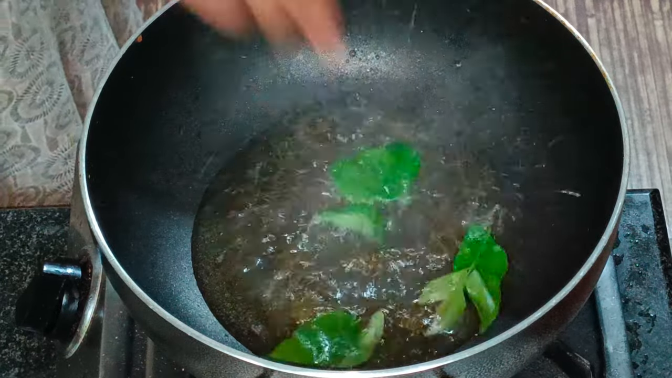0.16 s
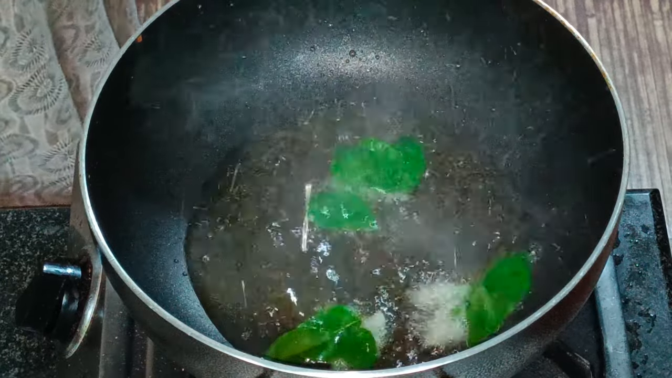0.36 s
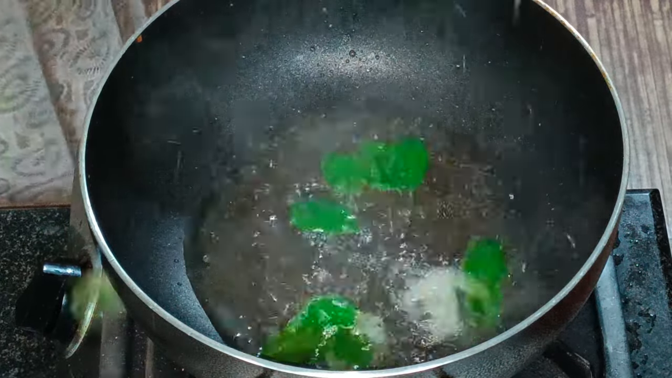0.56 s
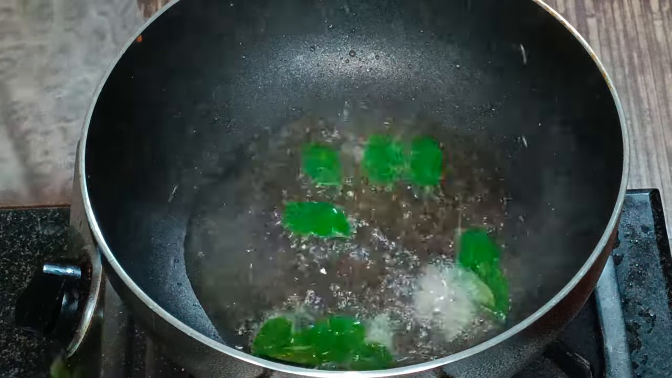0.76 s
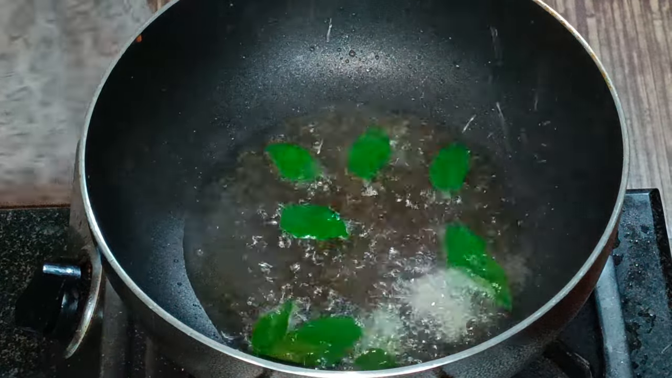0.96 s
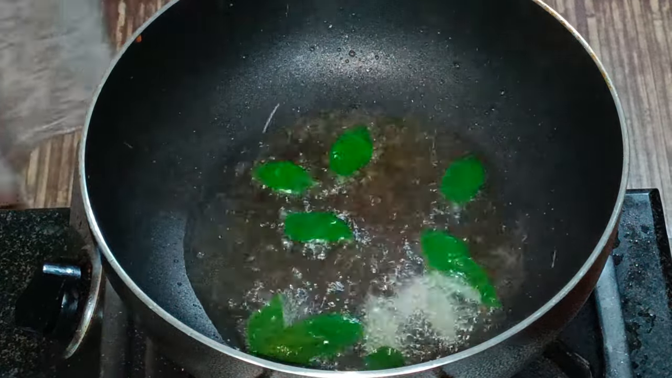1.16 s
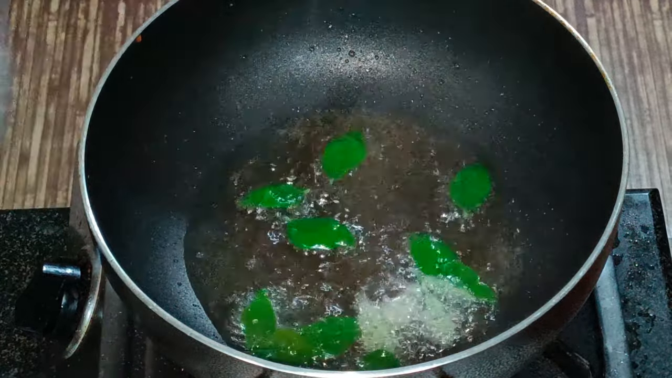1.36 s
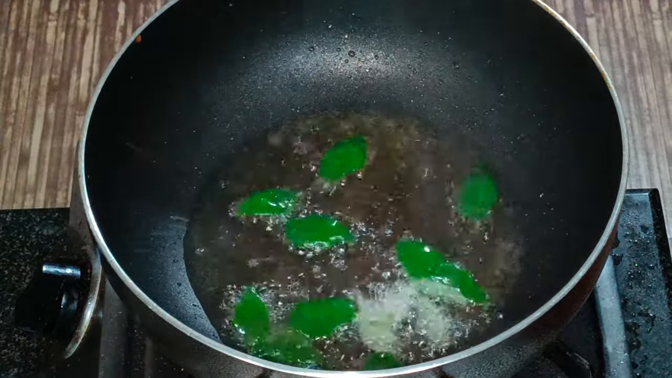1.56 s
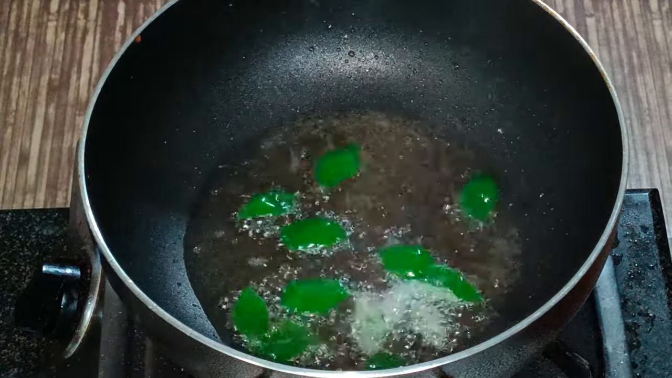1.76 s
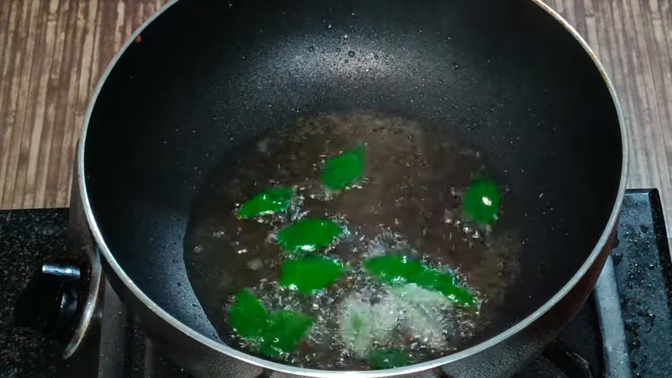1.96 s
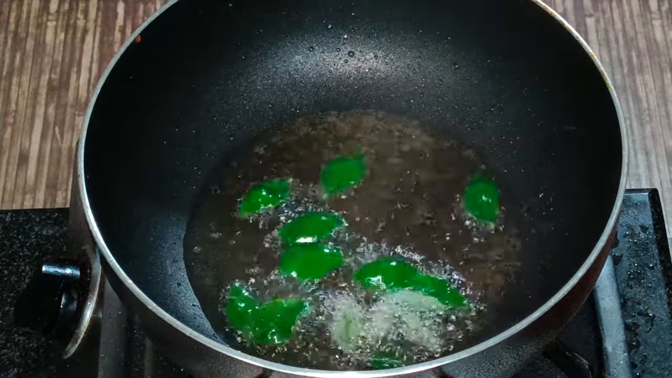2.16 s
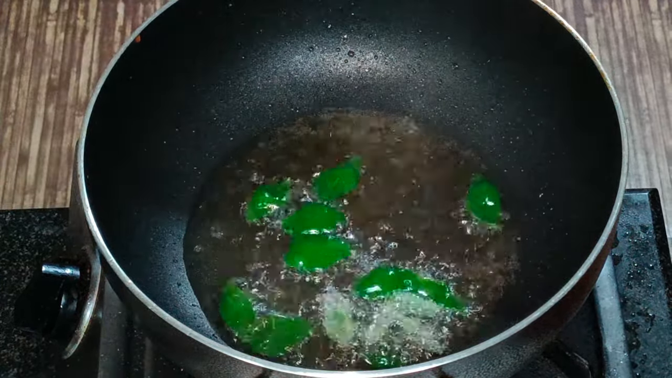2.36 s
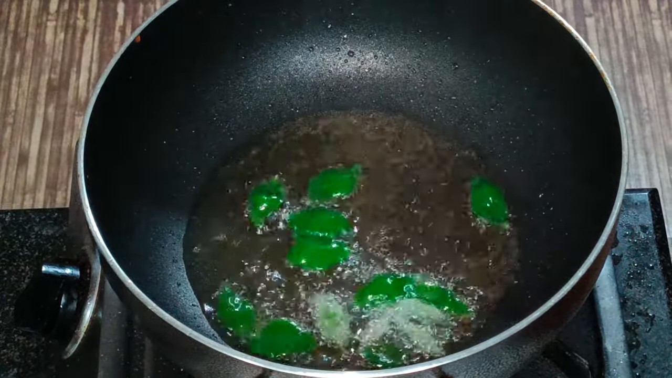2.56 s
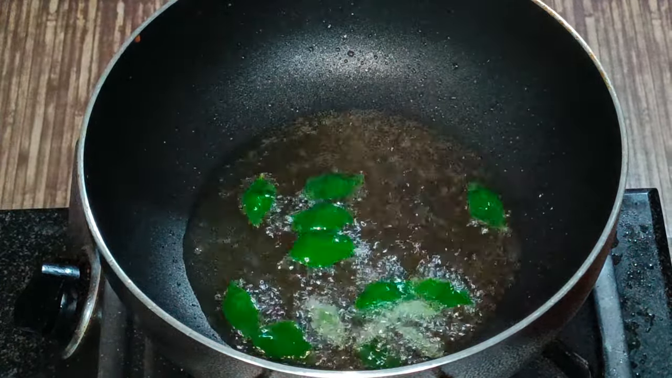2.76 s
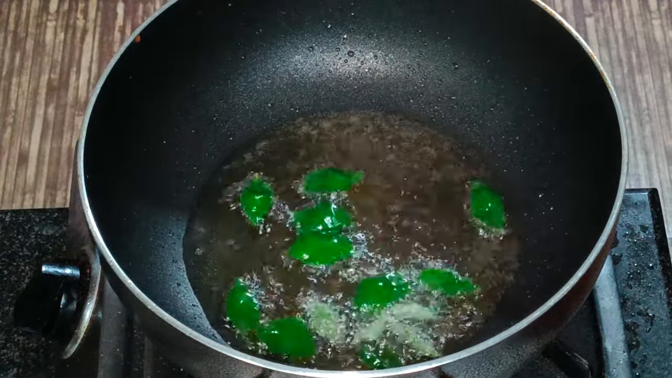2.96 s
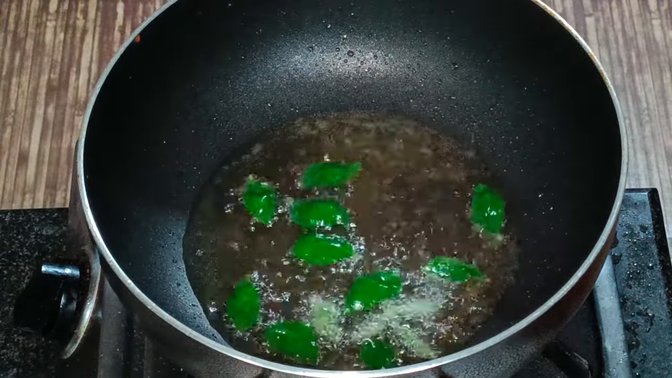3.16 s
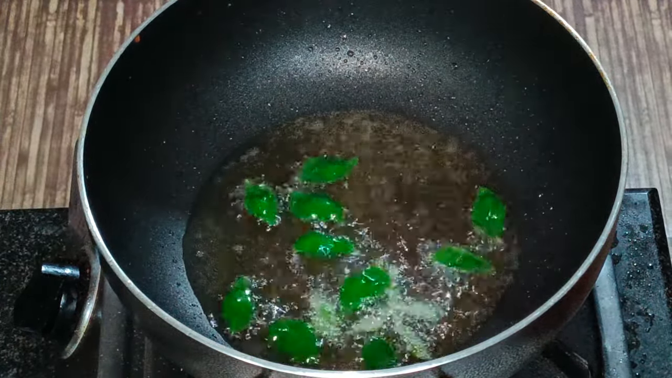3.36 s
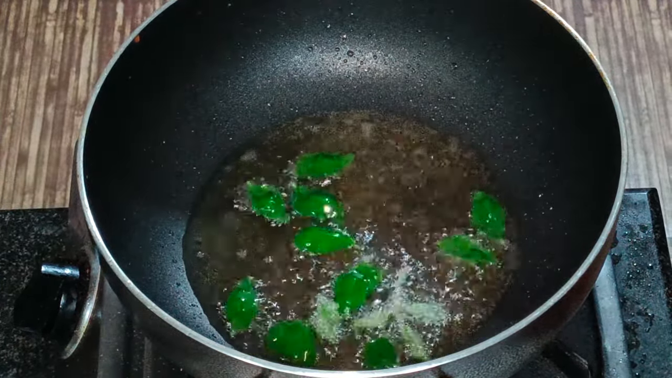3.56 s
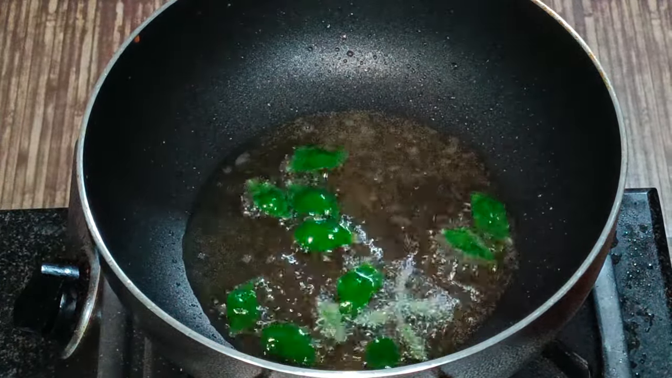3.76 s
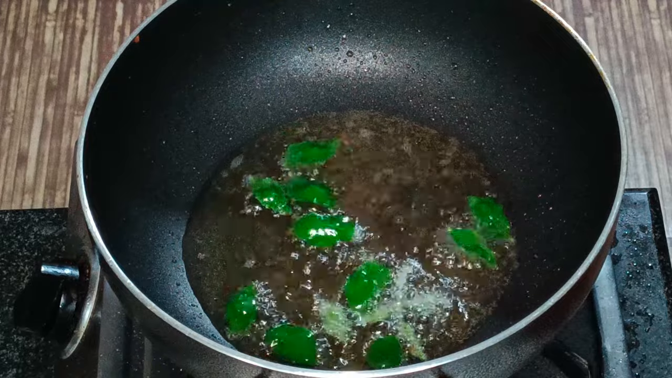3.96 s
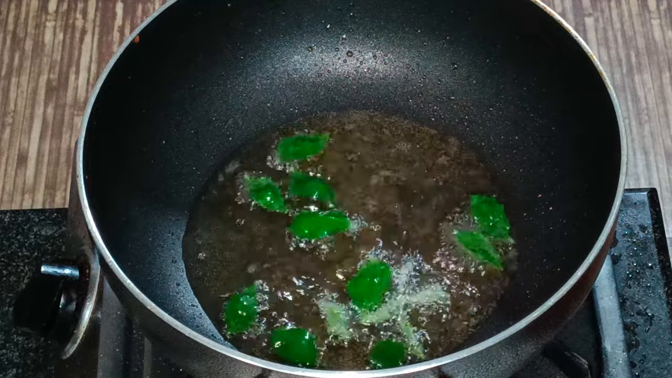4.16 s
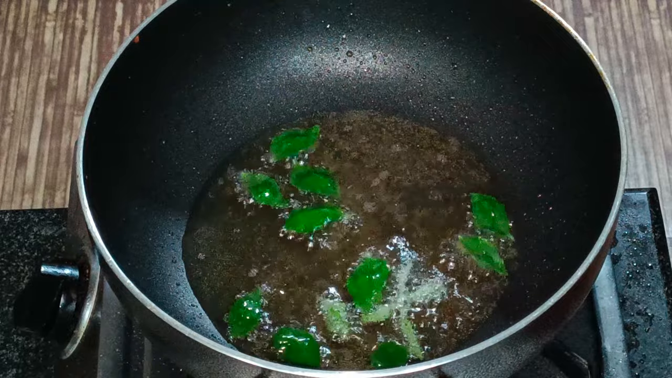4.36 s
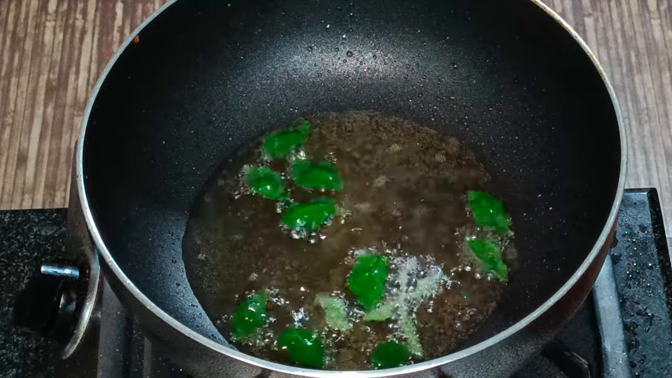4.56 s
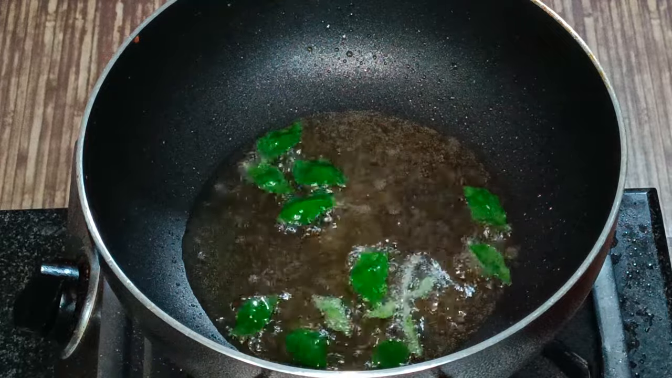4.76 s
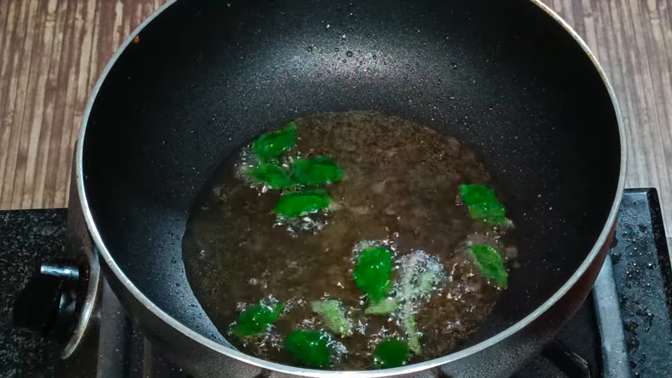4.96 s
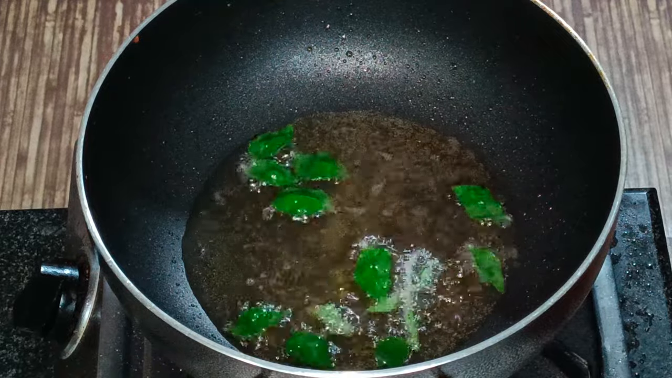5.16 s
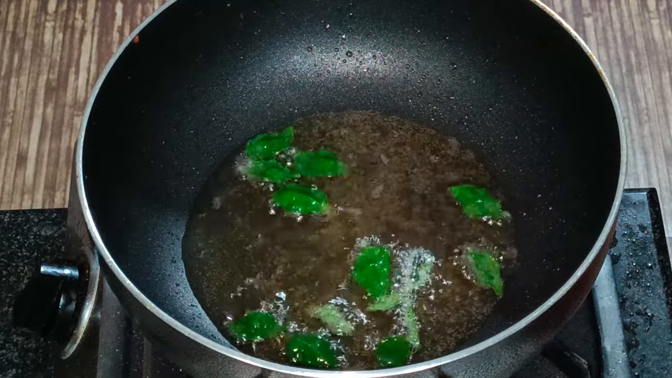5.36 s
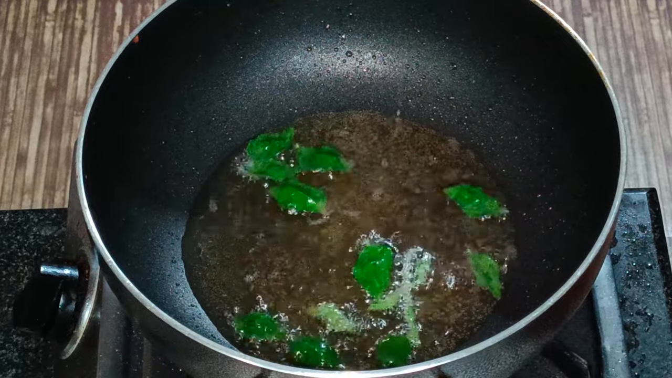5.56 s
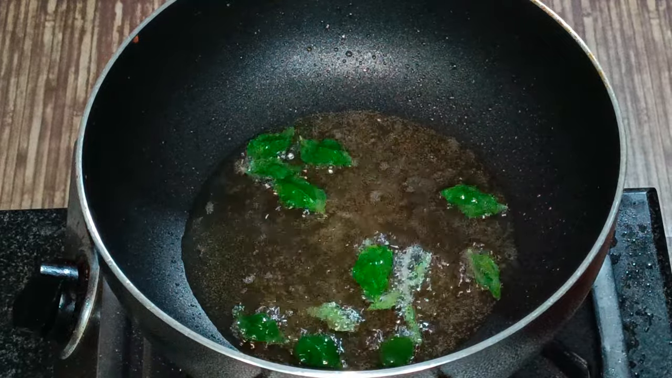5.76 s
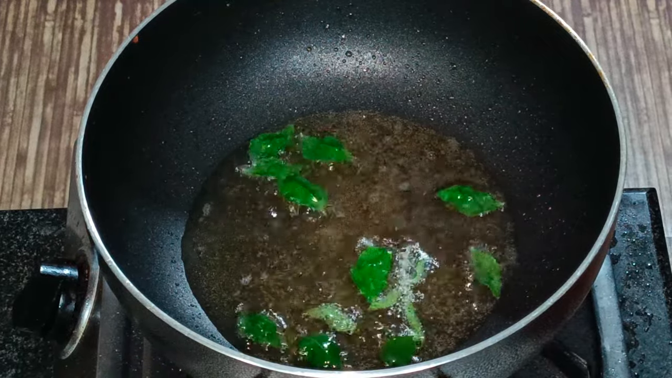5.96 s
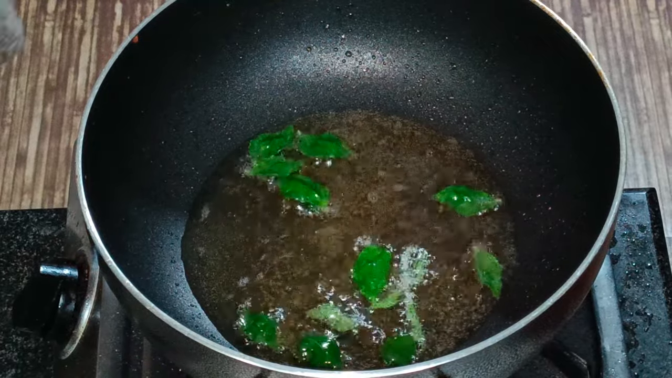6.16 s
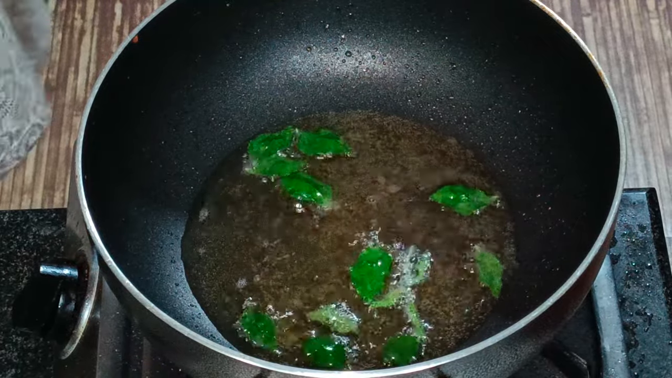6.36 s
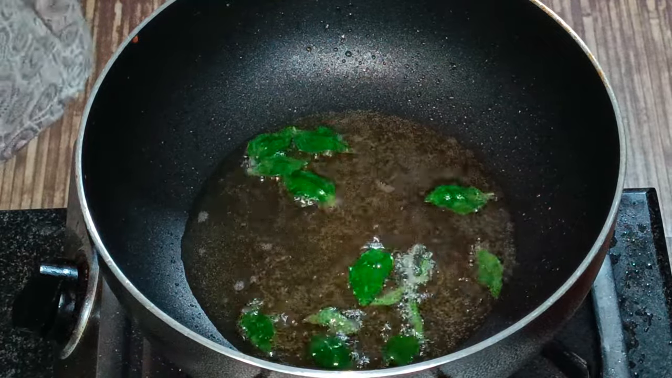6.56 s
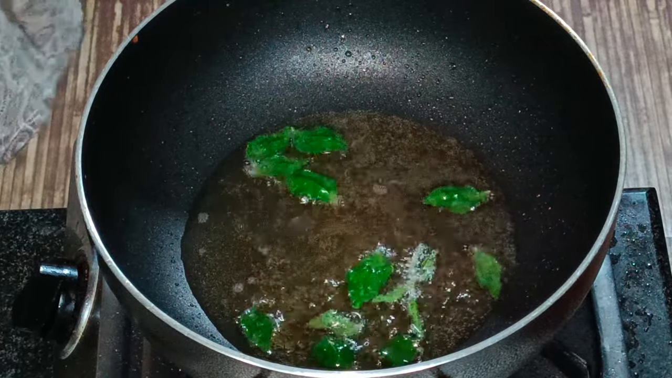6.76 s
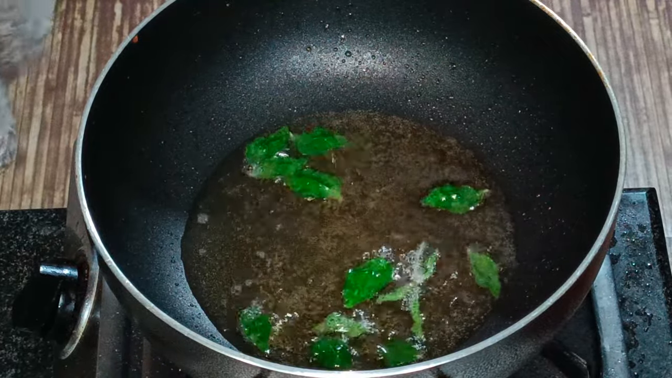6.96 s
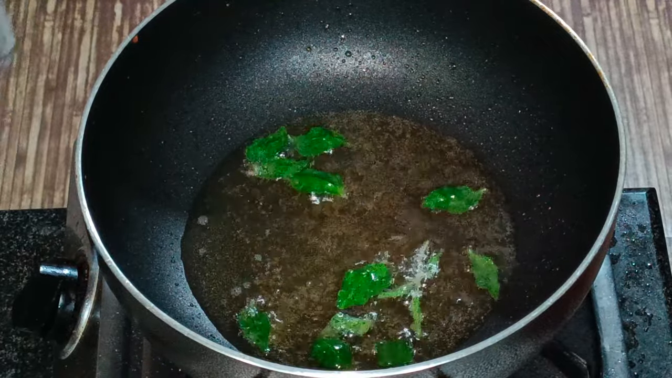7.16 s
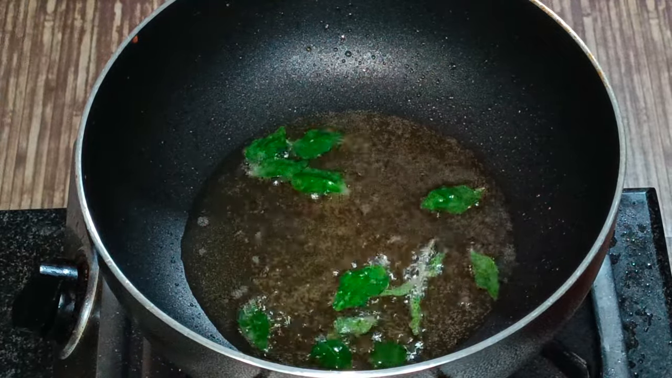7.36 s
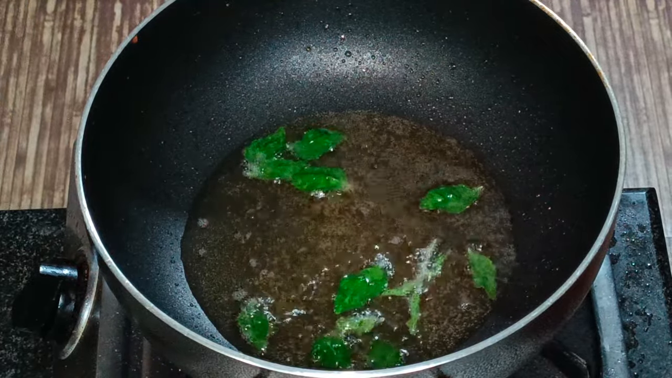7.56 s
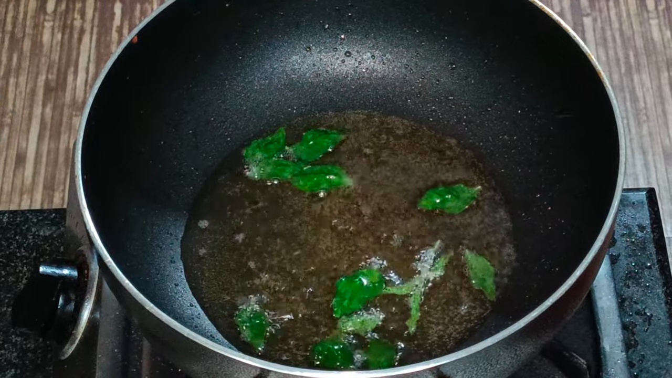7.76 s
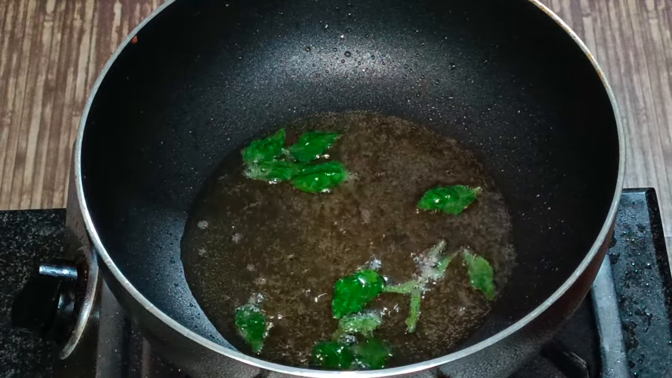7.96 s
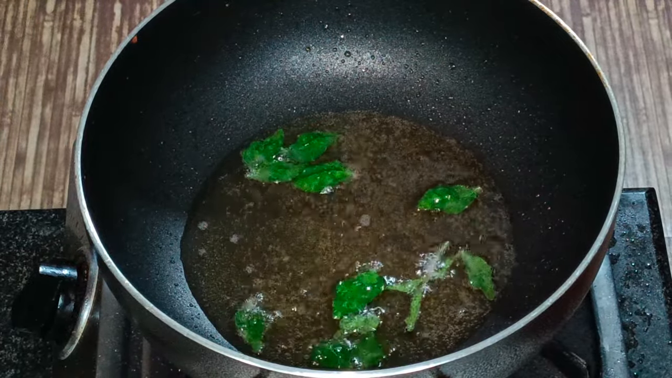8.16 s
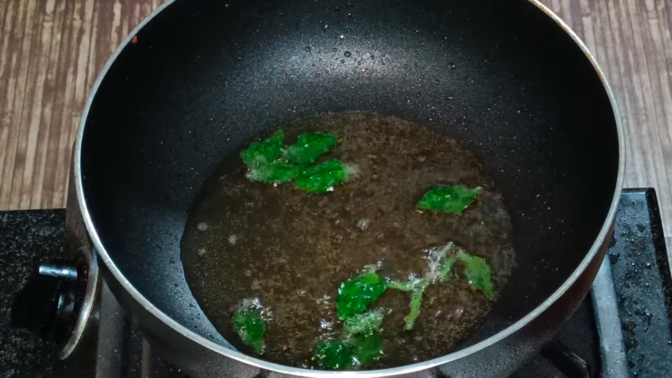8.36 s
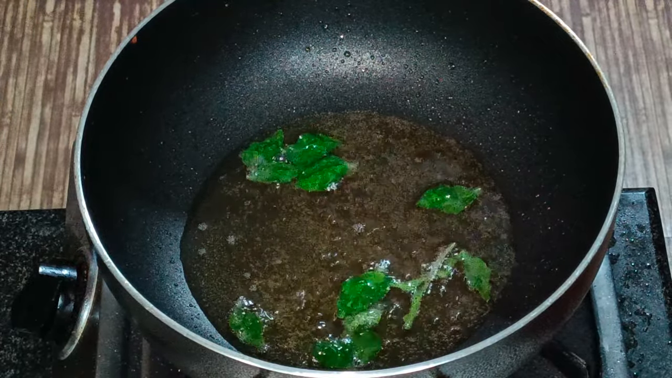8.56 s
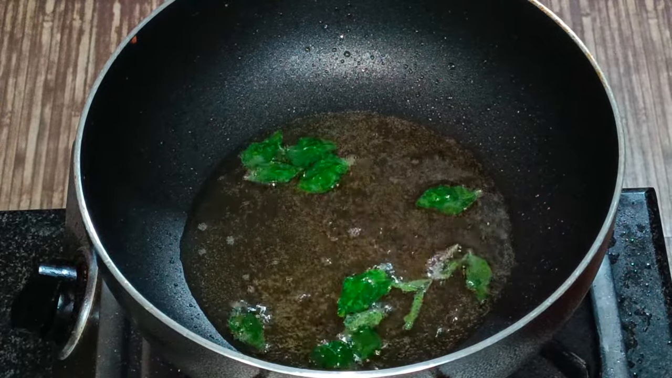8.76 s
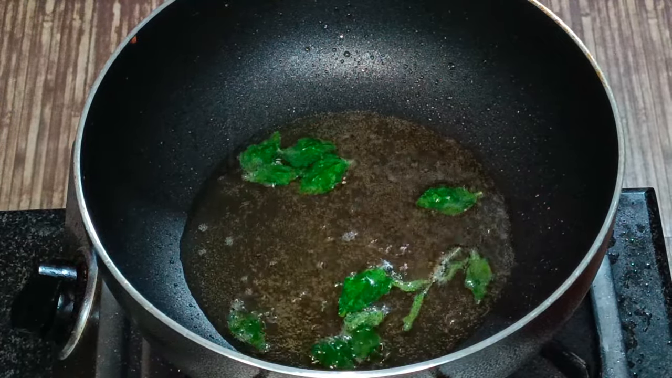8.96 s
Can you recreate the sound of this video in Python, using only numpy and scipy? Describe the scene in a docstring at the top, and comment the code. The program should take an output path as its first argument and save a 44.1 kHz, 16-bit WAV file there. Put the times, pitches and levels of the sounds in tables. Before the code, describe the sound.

Close up in stereo, a pan of hot oil erupts as damp leaves land: thick hissing steam, crackling spits and low bubbling foam. Soft low thumps come early. The crackle is busiest for about three seconds, then thins so that single plopping, ringing bubbles stand out. The end is sparse and quiet, with small ticks over a steady soft gas rush and little room echo.

```python
"""Fresh leaves fry in hot oil in a deep pan, close to a small stereo microphone.
Their water flashes to steam: random puffs of noise make a dense fizz with sharp spits, over throaty foam.
A few soft thumps fall early; as the fizz thins out, single bubbles pop as short ringing tones.
Late on there is one faint falling whistle. The bowl of the pan colours all of this, and the burner,
a steady filtered noise, rushes faintly underneath throughout."""
import sys
import numpy as np
from scipy import signal
from scipy.fft import rfft, irfft
from scipy.io import wavfile
from scipy.ndimage import uniform_filter1d

SR = 44100
rng = np.random.default_rng(int(sys.argv[2]) if len(sys.argv) > 2 else 0)


def unload_audio(sound):
    """Save the sound as a 16-bit wav file, at the path given as the first command line argument."""
    columns = np.transpose(np.atleast_2d(sound))
    # keep every value between -1 and 1, then stretch to whole-number steps
    steps = np.round(np.clip(columns, -1, 1) * 32767)
    wavfile.write(sys.argv[1], SR, steps.astype(np.int16))


N = 398134  # length in samples, about 9 s
BINS = np.fft.rfftfreq(N, 1 / SR)  # frequencies in Hz
WET_DB = -9  # the fizz level that the wet leaves start from


def amp(db):
    """Decibels to gain."""
    return 10 ** (np.asarray(db) / 20)


def read(points, hz):
    """A table's value on a log-frequency axis."""
    f, value = np.transpose(points)
    return np.interp(np.log(hz + 1), np.log(f + 1), value)


def curve(rows):
    """A control curve at every sample."""
    return np.interp(np.arange(N) / SR, *np.transpose(rows))


def add(mix, s, sound):
    """Lays a sound into the mix at time s."""
    part = mix[..., max(round(s * SR), 0):][..., :sound.shape[-1]]
    part += sound[..., :part.shape[-1]]


def swell(rise):
    """An envelope that reaches 1 after the rise time in seconds and then dies away."""
    u = np.arange(int(10 * rise * SR)) / (rise * SR)
    return u * np.exp(1 - u)


def sized(sound, db):
    """Scales a sound so that its energy, spread over 10 ms, has this level."""
    return sound * amp(db) * np.sqrt(.01 * SR / np.mean(np.sum(sound ** 2, -1)))


def local_mean(power, span):
    """Smooth average made by two running means, each over span seconds."""
    size = int(span * SR)
    once = uniform_filter1d(power, size)
    return np.abs(uniform_filter1d(once, size)) + 1e-14


def noise_pair():
    """Spectra of two white noises, alike by an amount that depends on frequency."""
    # Likeness of the two sides. Each row: frequency in Hz, likeness from 0 to 1.
    likeness = [(40, .5), (150, 0.99), (500, 0.69), (1400, 0.38), (2600, 0.21), (4000, 0.34), (6000, 0.67),
                (10000, 0), (15000, 0)]
    a, b = rfft(rng.standard_normal((2, N)))
    same = np.clip(read(likeness, BINS), 0, 1)
    return np.array([a, same * a + np.sqrt(1 - same ** 2) * b])


def kicks(per_s, spread_db):
    """Random impulses: many small, a few large."""
    sizes = np.minimum(rng.exponential(1, N), 3.5)
    return (rng.random(N) < per_s / SR) * amp(spread_db * sizes)


def moments(per_s, looseness=1.8, count=400):
    """Loosely spaced chance events at a changing rate: rows (sample, two random traits from -1 to 1)."""
    delay, first, second = rng.random((count, 3)).T
    expected = np.cumsum(per_s) / SR  # events due so far
    at = np.searchsorted(expected, np.arange(count) + looseness * delay)
    return [row for row in zip(at, 2 * first - 1, 2 * second - 1) if row[0] < N]


def steam(fizz_db, fizz_gain_db=-0.5, hiss_share=0.039, own_share=0.6, dulling=0.051,
          spit_octaves=0.74, spit_floor=0.99, spit_tilt=0.12, keener_per_s=0.07, count=500):
    """Each escape of steam is a short puff of noise with its own colour; countless tiny ones make the fizz."""
    # The strongest jets of steam bursting out of the leaves.
    # Each row: start in seconds, level in dB over 10 ms before colouring, length in seconds.
    strong_spits = [(0.07, -11, 0.0074), (0.292, -13, 0.0016), (0.909, -1.5, 0.00022), (0.947, -7.5, 0.002),
                    (1.209, -6, 0.0016), (1.561, -5.5, 0.0013), (1.799, -10.5, 0.002),
                    (2.0812, -7.5, 0.0029), (2.275, -9, 0.0049), (2.3244, -5, 0.00038), (2.416, -9, 0.0074),
                    (2.5, -7.5, 0.0044), (2.615, -8, 0.0021), (2.749, -10.5, 0.0015), (2.757, -10, 0.0025),
                    (3.063, -11.5, 0.0049), (3.12, -10, 0.0015), (3.198, -8.5, 0.0076),
                    (3.34, -13.5, 0.0038), (3.628, -13, 0.00081), (3.738, -21, 0.0014),
                    (3.852, -13.5, 0.0014), (3.966, -18.5, 0.0036), (4.1, -15, 0.0017),
                    (4.4463, -22, 0.00079), (4.757, -15, 0.0018), (5.0776, -16, 0.00023),
                    (5.138, -20.5, 0.0013), (5.263, -15, 0.00063), (5.5, -17.5, 0.00086),
                    (5.706, -22, 0.0029), (5.952, -19.5, 0.0036), (6.49, -24.5, 0.0018),
                    (8.207, -24, 0.0021), (8.301, -26, 0.0027), (8.8382, -26, 0.0018)]
    centres = np.geomspace(1200, 14000, 7)  # middles of the noise bands in Hz
    per_s = 150 + 3000 * amp(fizz_db)  # wetter leaves puff more often
    shared = 0.084 * puffs(0.0004, per_s) + 0.24 * puffs(0.0098, per_s)

    spits = np.zeros((len(centres), N))
    all_spits = list(strong_spits) + small_spits(fizz_db)
    for (s, db, length), hz in zip(all_spits, rng.uniform(5500, 14000, count)):
        tilt = spit_tilt + keener_per_s * s  # jets from drier leaves are keener
        broad = spit_floor * (centres / 8000) ** tilt
        peak = np.exp(-(np.log2(centres / hz) / spit_octaves) ** 2)  # each jet favours its own pitch
        colour = (broad + peak) / (1 + spit_floor)
        add(spits, s + length / 2, colour[:, None] * sized(snap(length), db))

    air, out = noise_pair(), np.zeros((2, N))
    for k, hz in enumerate(centres):
        band = np.sqrt(np.interp(np.log(BINS + 1), np.log(centres), np.arange(len(centres)) == k))
        tilt_db = dulling * (fizz_db + 60.0) * np.log2(hz / 8000)  # a gentler boil is duller
        grain = hiss_share + shared + own_share * puffs(0.0022, per_s)
        fizz_power = amp(fizz_db + fizz_gain_db + tilt_db) ** 2 * grain
        out += irfft(air * band, N) * np.sqrt(fizz_power + spits[k] ** 2)
    return out


def wetness(flutter_db=1.17, slow_hz=2.5, fast_hz=17.0, count=24):
    """Level of the fizz in dB: it falls as the leaves dry, and flutters a little on the way."""
    drying_db_per_s, dry_db = 4.5, -40  # a steady fall that meets a faint lasting sizzle
    t = np.arange(0, N / SR + .01, .005)
    level = np.hypot(amp(WET_DB - drying_db_per_s * t), amp(dry_db))
    rates = np.geomspace(slow_hz, fast_hz, count)
    flutter = sum(np.sin(2 * np.pi * (hz * t + rng.random())) for hz in rates)
    return curve(np.transpose([t, 20 * np.log10(level) + flutter_db * flutter / flutter.std()]))


def puffs(length, per_s, spread_db=8.5):
    """Power of a random run of puffs, with a local mean of about 1."""
    power = np.abs(signal.oaconvolve(kicks(per_s, spread_db) ** 2, snap(length) ** 2)[:N])
    return power / local_mean(power, 0.32)


def snap(length, attack=0.22, tail=0.095, tail_s=0.017):
    """Envelope of a jet of steam: it breaks out abruptly, runs down, and lingers faintly in the pan."""
    t = np.arange(int(.05 * SR)) / SR
    onset = 1 - np.exp(-t / (attack * length))
    return onset * np.hypot(np.exp(-t / (2 * length)), tail * np.exp(-t / tail_s))


def small_spits(fizz_db, wet_db=-9.0, follow=0.74, spread_db=2.5, wet_per_s=17., thinning=0.2,
                length_s=0.001, length_octaves=1.2):
    """Lesser jets come at random, weaker and rarer as the leaves dry: rows (s, level dB, length s)."""
    dried_db = fizz_db - WET_DB
    rows = []
    for at, size, span in moments(wet_per_s * amp(thinning * dried_db)):
        db = wet_db + follow * dried_db[at] + spread_db * size
        rows.append((at / SR, db, length_s * 2 ** (length_octaves * span)))
    return rows


def lulls():
    """Gain that dips briefly, so that the sizzle sags for a moment."""
    # Brief lulls in the sizzle. Each row: middle in seconds, half length in seconds, depth in dB.
    dips = [(0.232, 0.011, -6.5), (0.913, 0.021, -14.5), (1.103, 0.03, -7.5), (2.371, 0.02, -5.5),
            (2.479, 0.013, -6.5)]
    t = np.arange(N) / SR
    return amp(sum(db * np.exp(-((t - s) / half) ** 2) for s, half, db in dips))


def bubble(hz, width, glide=0.0052, slap=1.0, slap_width=1500, scatter_db=5.0, scatter_s=0.013,
           apart=1.0, echo=0.48, echo_s=.003):
    """A bubble opens with a broad slap and rings briefly; the pan walls scatter it differently to each side."""
    envelope = swell(1 / (2 * width)) ** 2  # widths in Hz: the wider, the shorter
    age = np.arange(len(envelope)) / len(envelope)
    opening = np.zeros(len(age))
    add(opening, 1 / (4 * width), slap * swell(1 / (2 * slap_width)) ** 2)
    phase = 2 * np.pi * np.cumsum(hz * (1 + glide * (9 * age - 1))) / SR  # the pitch creeps up
    ring = envelope * np.sin(phase) + opening * np.cos(phase)

    t = np.arange(int(.05 * SR)) / SR
    walls = rng.standard_normal(len(t)) + apart * rng.standard_normal((2, len(t)))
    walls *= np.exp(-t / scatter_s) * (t > .001)
    walls *= amp(scatter_db) / np.linalg.norm(walls[0])
    walls[:, 0] = 1  # the direct sound
    walls[:, int(echo_s * SR * rng.uniform(.7, 1.3))] += echo  # the bowl focuses one strong echo
    return signal.fftconvolve(ring[None], walls, axes=1)


def pops(damping=0.189, damping_spread=0.15, cluster_db=-14.5, cluster_spread_db=2.0,
         first_s=0.004, last_s=0.03, smaller_octaves=0.44, count=2):
    """A large bubble rings for about as many cycles at any pitch, and sets off smaller, higher ones beside it."""
    # The largest bubbles opening at the surface.
    # Each row: start in seconds, level in dB over 10 ms before the pan, pitch in Hz.
    large_bubbles = [(0.0039, -11.5, 1300), (0.024, -21, 1300), (0.087, -16.5, 1360), (0.382, -16, 3900),
                     (0.8063, -17, 1590), (1.543, -17, 3400), (1.6323, -17.5, 1420), (1.8687, -12, 1630),
                     (1.9443, -12.5, 1610), (2.238, -12, 2490), (2.4994, -18.5, 3700), (2.588, -14, 1520),
                     (2.7768, -15, 2700), (2.8316, -16, 2700), (2.909, -17, 2100), (2.9805, -20.5, 2770),
                     (3.1832, -10.5, 1580), (3.322, -17.5, 2340), (3.3692, -19.5, 1800),
                     (3.4018, -15, 5000), (3.4458, -21, 1690), (3.4917, -15.5, 2220), (3.5658, -19, 1780),
                     (3.618, -15.5, 2540), (3.753, -16, 4060), (3.8463, -16, 2090), (3.9101, -20, 1530),
                     (4.0412, -17.5, 2240), (4.113, -20, 2000), (4.1372, -20, 3850), (4.197, -14, 1660),
                     (4.2713, -20.5, 2250), (4.3496, -21, 2060), (4.73, -18.5, 2090), (4.8013, -24.5, 2740),
                     (4.838, -22.5, 3056), (4.858, -26, 2300), (4.924, -23.5, 1960), (4.9795, -22.5, 2760),
                     (5.0534, -22.5, 2090), (5.0784, -17.5, 3510), (5.1895, -20.5, 1889),
                     (5.2269, -12.5, 1700), (5.4644, -21, 2030), (5.4994, -16, 2540), (5.5797, -21.5, 1740),
                     (5.641, -20, 3100), (5.6797, -23.5, 2990), (5.9257, -22, 3270), (6.1286, -28, 1406),
                     (6.2213, -31.5, 3273), (6.3476, -17.5, 2022), (6.393, -29.5, 3740),
                     (6.646, -19.5, 1700), (6.6681, -24.5, 2700), (6.7015, -22, 1830), (6.763, -31, 1406),
                     (6.8536, -32, 2586), (7.163, -24, 1830), (7.2873, -30, 1390), (7.3658, -32.5, 3070),
                     (7.4534, -36, 1347), (7.5125, -29.5, 1680), (7.592, -28.5, 1390),
                     (7.6457, -21.5, 3430), (7.809, -25, 2180), (7.8728, -29, 3140), (8.1245, -23, 1987),
                     (8.212, -21, 3860), (8.2524, -22.5, 1990), (8.5423, -21.5, 1443), (8.603, -21, 2470),
                     (8.7035, -26, 2180)]
    total = len(large_bubbles)
    out = np.zeros((2, N))
    traits = rng.uniform(-0.62, 1, total), rng.random((total, count, 3))
    for (s, db, hz), own, cluster in zip(large_bubbles, *traits):
        width = damping * hz * np.exp(damping_spread * own)
        large = bubble(hz, width, slap=1.33, slap_width=1650, scatter_db=1.2, scatter_s=0.0086, echo=0.37)
        add(out, s, sized(large, db))
        for when, size, pitch in cluster:
            small_hz = hz * 2 ** (smaller_octaves * pitch)
            small_db = db + cluster_db + cluster_spread_db * (2 * size - 1)
            small = sized(bubble(small_hz, damping * small_hz, scatter_db=-4.0), small_db)
            add(out, s + first_s + (last_s - first_s) * when, small)
    return out


def boil(spread_db=1.5, middle_hz=2650, octaves=0.71, damping=0.2, count=36):
    """Middling bubbles pop at random, as often and as loudly as the oil boils."""
    # How hard the oil boils round the leaves. Each row: time in seconds,
    # middle level of a bubble in dB over 10 ms before lulls and pan, bubbles per second.
    boiling = [(0, -29, 16.3), (1.1, -30, 16), (1.7, -21.5, 33.3), (2.4, -25.5, 17.2), (3.0, -30, 17.7),
               (3.5, -25, 26.6), (4.301, -25.5, 33), (4.5, -35.5, 19.2), (4.75, -28, 34), (5.15, -29.5, 26),
               (5.35, -32, 8.1), (6.298, -37, 13), (7.0, -38, 7.7), (9.0, -30, 5.9)]
    s, db, per_s = np.transpose(boiling)
    level_db, out = curve(np.transpose([s, db])), np.zeros((2, N))
    kinds = []
    for hz in middle_hz * 2 ** (octaves * np.linspace(-1, 1, count)):
        one = bubble(hz, damping * hz, slap=1.25, slap_width=2700, scatter_db=4.0, scatter_s=0.0058)
        kinds.append(sized(one, 0))
    for at, size, pitch in moments(curve(np.transpose([s, per_s]))):
        kind = kinds[int(count * (pitch + 1) / 2)]
        add(out, at / SR, amp(level_db[at] + spread_db * size) * kind)
    return out


def simmer(per_s=130, low_hz=1800, high_hz=4600, damping=0.19, count=36):
    """Small bubbles of all sizes burst at random around the leaves."""
    # Simmer of small bubbles. Each row: time in seconds, level in dB before lulls and pan.
    simmering = [(0, -30), (0.45, -24), (1.0, -31), (1.8, -23.5), (2.8, -33.5), (3.4, -25), (4.3, -64),
                 (4.5, -63), (5.0, -48), (6.0, -45), (9.0, -49)]
    out = np.zeros((2, N))
    sizes = kicks(per_s, 10.4)
    kinds = [sized(bubble(hz, damping * hz), 0) for hz in np.geomspace(low_hz, high_hz, count)]
    for at in np.flatnonzero(sizes):
        add(out, at / SR, sizes[at] * kinds[rng.integers(count)])
    evened = out / np.sqrt(local_mean(np.mean(out ** 2, 0), 0.44))
    return evened * amp(curve(simmering))


def froth(low_hz=420, high_hz=1500, per_s=400):
    """Foam heaving up round the wet leaves: a lower, throaty bubbling, made of noise in a low band."""
    # Foam round the leaves. Each row: time in seconds, level in dB before lulls and pan.
    foam = [(0, -21.5), (0.12, -20), (0.24, -32.5), (0.4, -25), (0.8, -47), (1.1, -48), (3.0, -61),
            (9.0, -46.5)]
    band = 1 / np.sqrt((1 + (low_hz / (BINS + 1)) ** 8) * (1 + (BINS / high_hz) ** 6))
    body = irfft(noise_pair() * band, N)
    heaving = np.sqrt(.5 + .5 * puffs(0.0025, per_s, spread_db=33.0))
    return amp(curve(foam)) * body / body.std() * heaving


def thumps(knock=0.8, knock_hz=600):
    """A low, heavily damped push with a dull knock on top."""
    # Soft low thumps. Each row: start in seconds, level of the push in dB before it is
    # shared between the sides, pitch in Hz, swell time in seconds.
    pushes = [(0.109, -34.5, 80, 0.0026), (0.352, -32, 132, 0.0038), (0.847, -24, 133, 0.0043),
              (2.447, -26, 135, 0.0035)]
    out = np.zeros(N)
    for s, db, hz, rise in pushes:
        envelope = swell(rise)
        t = np.arange(len(envelope)) / SR
        dull = signal.lfilter(*signal.butter(2, knock_hz, fs=SR), rng.standard_normal(len(t)))
        push = -np.sin(2 * np.pi * hz * t)
        add(out, s, amp(db) * envelope * (knock * dull / dull.std() + push))
    return out * amp([[2.5], [-3.5]])  # louder on the left


def whistle(start_s=6.45, length=0.099, hz=1190, fall=0.031, db=-51):
    """One faint, slightly falling whistle, as of steam through a pinhole."""
    out, u = np.zeros(N), np.linspace(0, 1, int(length * SR))
    tone = np.sin(2 * np.pi * np.cumsum(hz * (1 - fall * u)) / SR)
    add(out, start_s, amp(db) * np.sin(np.pi * u) * tone)
    return out


def coloured(x, gain, size=4096):
    """Causal filter with the given gain as a function of frequency."""
    log_gain = np.log(gain(np.abs(np.fft.fftfreq(size, 1 / SR))))
    # this phase makes the filter answer as early as it can
    taps = np.fft.ifft(np.exp(np.conj(signal.hilbert(log_gain)))).real[:size // 2]
    return signal.oaconvolve(x, taps)[:N]


def bowl_gain(hz):
    """The air in the pan rings at its modes and lets little bass out."""
    # Air modes of the bowl. Each row: frequency in Hz, width in Hz, level in dB over the direct sound.
    air_modes = [(560, 77, 11.5), (836, 194, 8), (1300, 31, -10.5), (1660, 37, -47), (1830, 285, -4),
                 (2310, 64, -2), (2650, 135, -2), (3056, 86, -1)]
    # How well the oil surface radiates out of the pan, relative to the last row.
    # Each row: frequency in Hz, level in dB.
    radiation = [(40, -32.5), (200, -36.5), (400, -16.5), (700, -21.5), (1000, -19.5), (1150, -23),
                 (1270, -3.5), (1560, -8.5), (1670, -18.5), (1770, -9), (3400, -11), (4500, -4)]
    modes = sum(amp(db) / (1 + (2 * (hz - f) / width) ** 2) for f, width, db in air_modes)
    return amp(read(radiation, hz) - radiation[-1][1]) * (1 + modes)


def kitchen(x, wet_db=-10.0, wander_hz=3., count=4):
    """A short diffuse tail with its own decay per pitch; it changes as the boiling wanders over the pan."""
    # Echo of the kitchen. Each row: frequency in Hz, time to fall by 60 dB in seconds.
    decay = [(200, 0.11), (1500, 0.21), (5000, 0.21), (15000, 0.3)]
    wet, turn = np.zeros((2, N)), np.pi * wander_hz * np.arange(N) / SR
    for k in range(count):
        hz, t, z = signal.stft(rng.standard_normal((2, SR // 2)), SR, nperseg=256)
        fading = amp(-60 * t / read(decay, hz)[:, None])
        tail = signal.istft(z * fading, SR, nperseg=256)[1]
        tail[:, :int(.007 * SR)] = 0  # no echo in the first 7 ms
        share = np.sin(turn * (1 + k / count) + k) * np.sqrt(2 / count)
        wet += signal.oaconvolve(x * share, tail / np.linalg.norm(tail[0]), axes=1)[:, :N]
    return x + amp(wet_db) * wet


def burner(level_db=-47.5):
    """Low steady rush under the pan, made of filtered noise."""
    # Colour of the rush. Each row: frequency in Hz, relative level in dB per Hz.
    rush_colour = [(20, -32), (54, -21), (90, -7.5), (125, 0), (155, 4), (200, 3.5), (280, 0), (356, 6),
                   (430, -2), (580, 2), (715, -2.5), (860, 0.5), (1200, -6.5), (4000, -16), (16000, -31)]
    rush = irfft(noise_pair() * amp(read(rush_colour, BINS)), N)
    return amp(level_db) * rush / rush.std()


def scene():
    """Steam and bubbles sound through the pan into the kitchen; the left microphone is a little nearer."""
    sizzle = boil() + steam(wetness()) + froth() + simmer()
    oil = pops() + sizzle * lulls()
    pan = np.array([coloured(side, bowl_gain) for side in oil])
    pan[1] = np.pad(pan[1], (2, 0))[:N]  # the right side hears the pan two samples later
    return kitchen(pan + thumps() + whistle()) + burner()


def record(dry, edge_hz=16000):
    """The two ports colour the treble, the highest peaks are rounded off; then the band limit."""
    # Each microphone port has its own resonance; levels count from the first row.
    # Each row: frequency in Hz, level in dB.
    left_port = [(2000, -3), (3600, -2), (4600, -12.5), (6200, -17), (7200, -12.5), (7700, -7.5),
                 (8200, -4), (9000, -10), (10500, -13), (12000, -12.5), (13500, -20.5), (15500, -11)]
    right_port = [(2000, -3), (3600, 4), (4700, -7.5), (5500, -3.5), (6050, 4), (6600, -3), (7300, -15),
                  (8000, -21), (9300, -23), (11500, -28.5), (13500, -13), (15500, -20)]
    heard = np.array([coloured(side, lambda hz: amp(read(port, hz) - port[0][1]))
                      for side, port in zip(dry, (left_port, right_port))])
    heard /= (1 + (heard / .75) ** 4) ** .25
    low_pass = signal.firwin(511, edge_hz, window=("kaiser", 9), fs=SR)
    return signal.oaconvolve(heard, low_pass[None], "same")


dry = scene()
out = record(dry)
unload_audio(out)
```